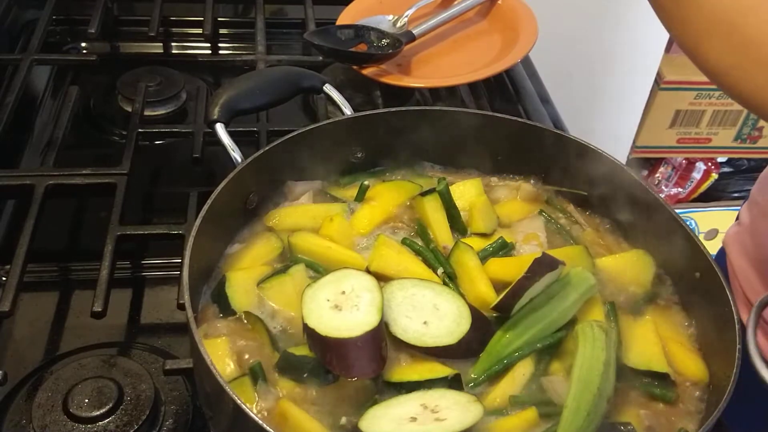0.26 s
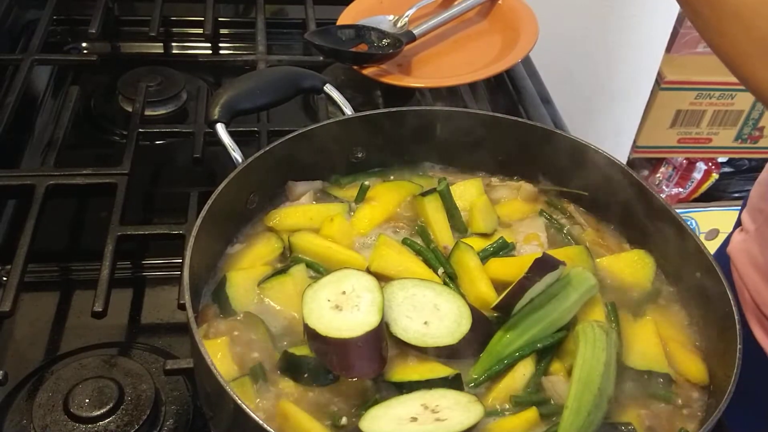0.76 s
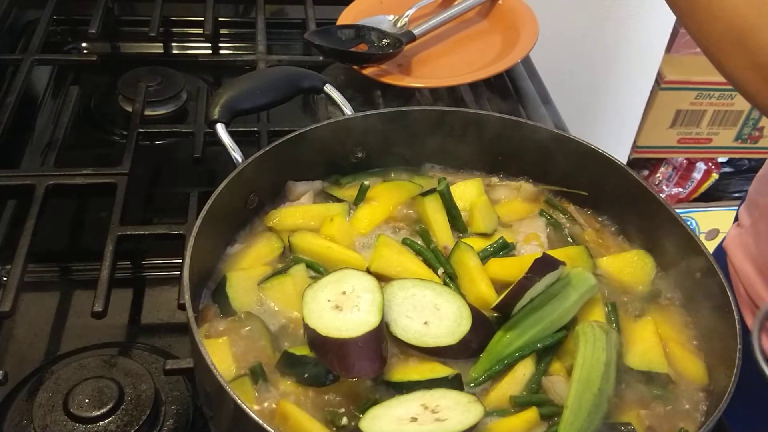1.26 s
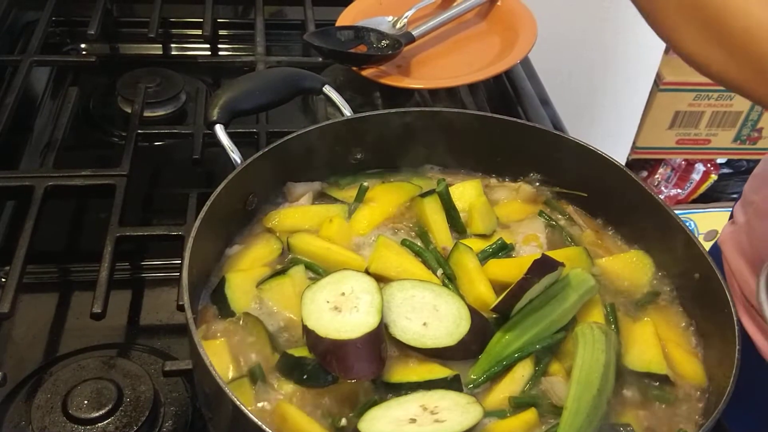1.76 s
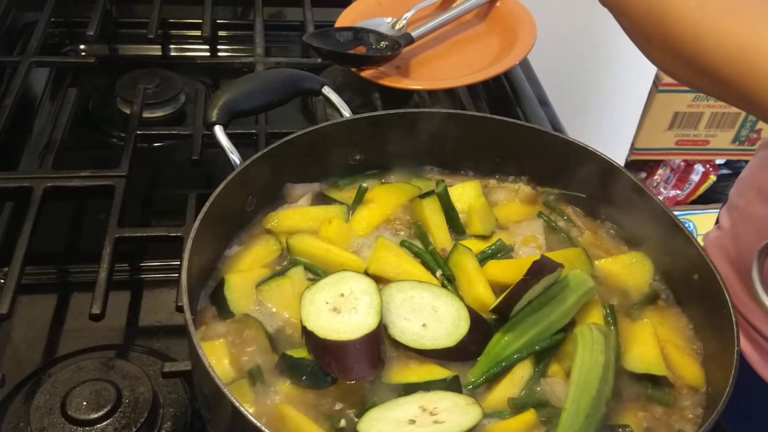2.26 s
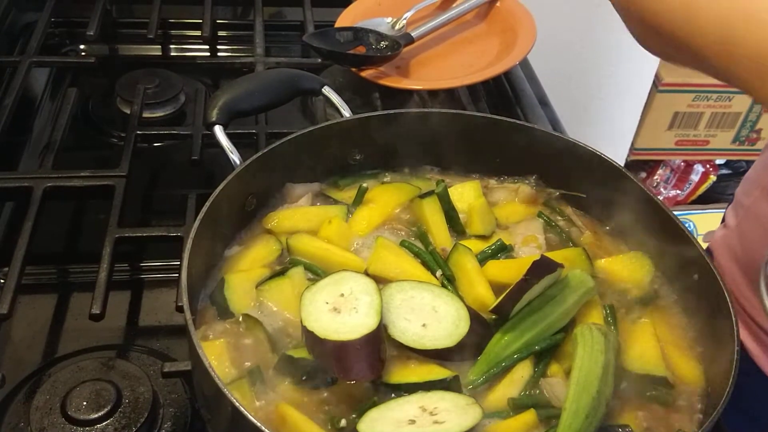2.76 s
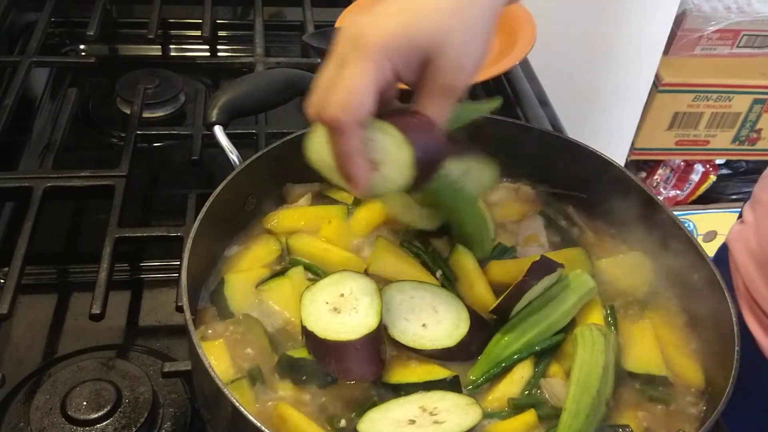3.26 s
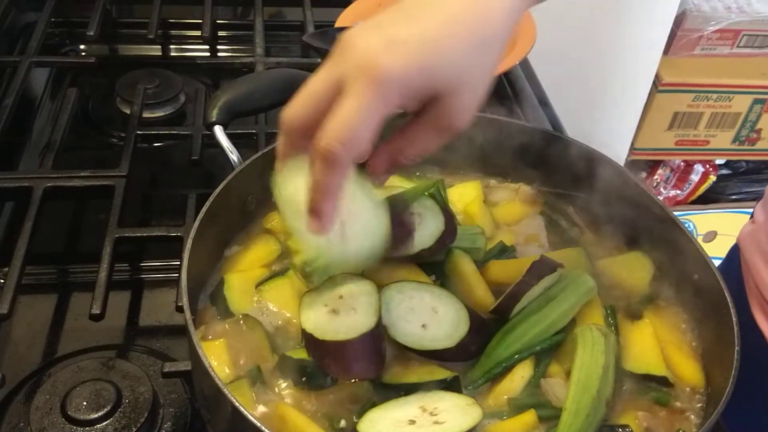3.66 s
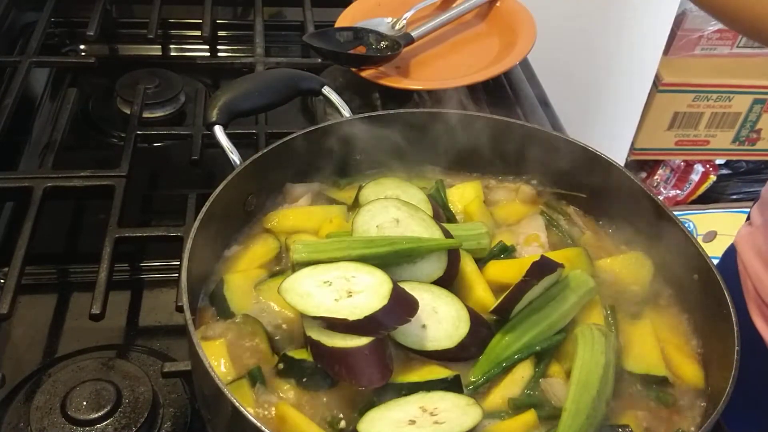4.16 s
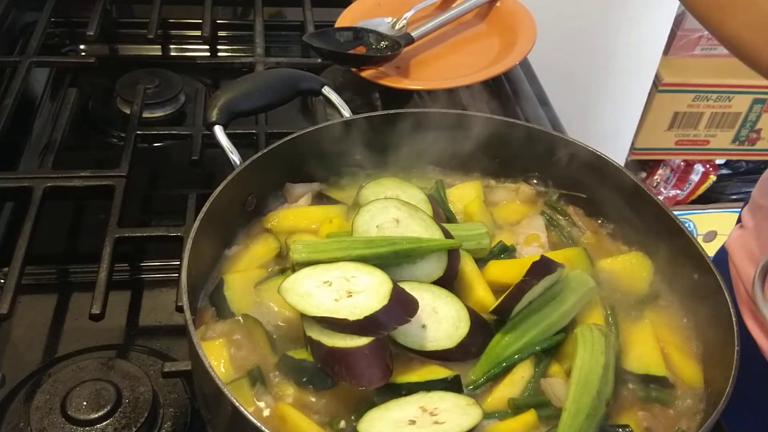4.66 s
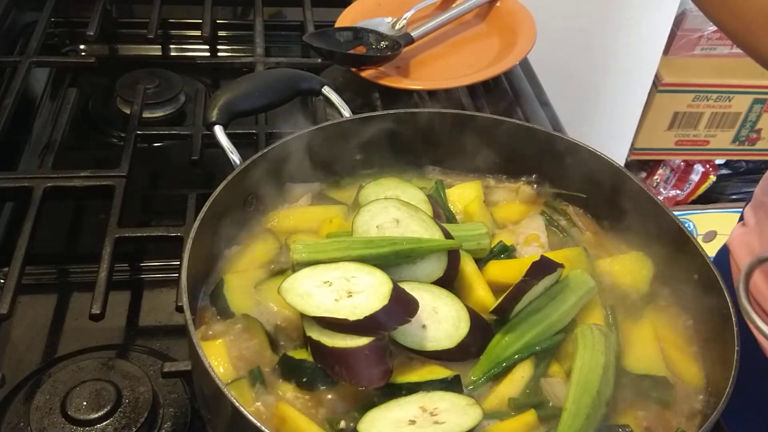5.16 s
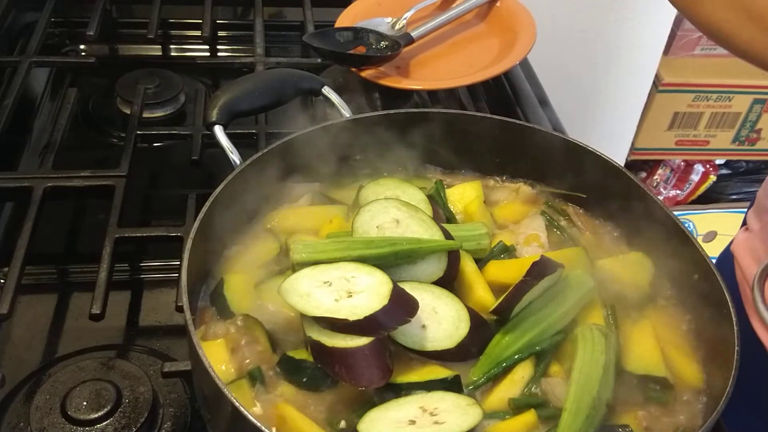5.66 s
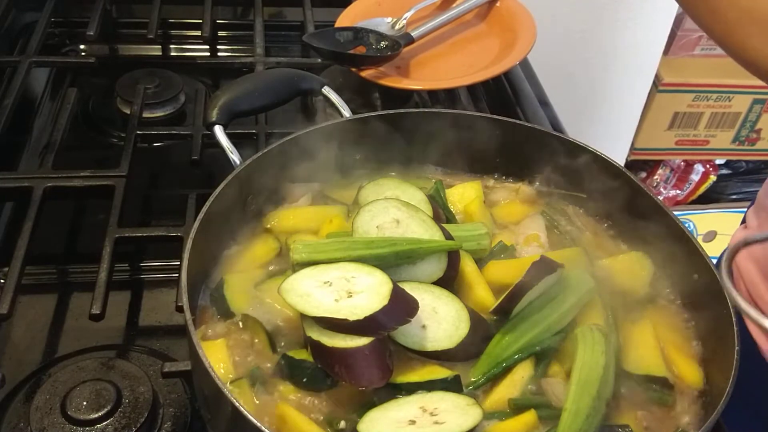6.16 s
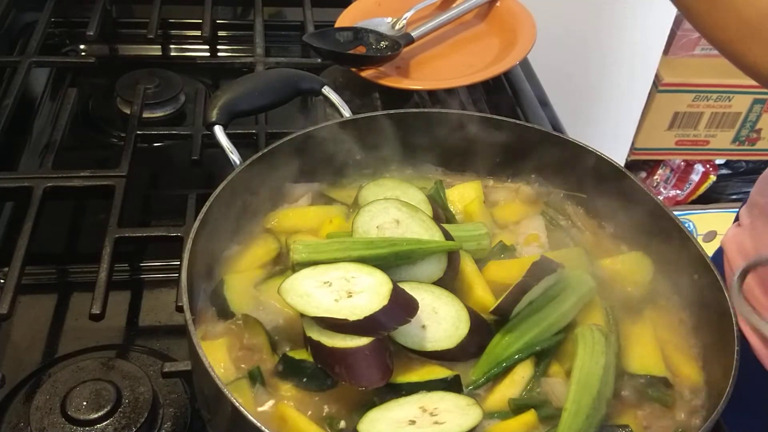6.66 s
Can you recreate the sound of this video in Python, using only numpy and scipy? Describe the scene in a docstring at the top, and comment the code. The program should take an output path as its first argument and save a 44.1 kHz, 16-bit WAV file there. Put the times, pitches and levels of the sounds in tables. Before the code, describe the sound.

Close stereo phone pickup of small wet bubbles popping in a simmering pot over very faint hiss and rumble. Sharp metallic ticks and clinks come irregularly beside it, with low thumps at the opening and at one and a half seconds. A quieter bubbling stretch follows, then scattered clinks, a brief scrape, and a cluster of harder clinks around a ringing bowl hit, with a short room tail.

```python
"""Steel kitchenware beside a simmering pot

Steel clinks (noisy crack plus ringing modes), a struck bowl, scrapes and dull worktop knocks, close to a phone.
A wide pot simmers on a gas stove: bubbles are damped gliding tones, single or crowded into clusters.
Filtered noise makes rumble, hiss and the kitchen's tail; sines make the hum. The phone's noise suppressor
holds these down and lets them up while something louder sounds."""
import sys
import numpy as np
from scipy import signal
from scipy.fft import rfft, irfft, next_fast_len
from scipy.io import wavfile
from scipy.ndimage import uniform_filter1d, minimum_filter1d

SR = 44100
rng = np.random.default_rng(int(sys.argv[2]) if len(sys.argv) > 2 else 0)


def materialize(psi):
    """Save the field psi as 16-bit PCM at rate SR to the path in sys.argv[1].

    A 1-D psi becomes a single channel; in a 2-D psi each row is a channel.
    """
    bounded = np.clip(np.atleast_2d(psi).T, -1, 1)
    quanta = np.round(bounded * 32767).astype(np.int16)
    wavfile.write(sys.argv[1], SR, quanta)


N = 304731

# kitchen rumble, relative spectrum: f/Hz, level/dB
RUMBLE_SPECTRUM = [(24, -60), (40, -4.5), (180, -9.5), (218, -3), (333, -13.5), (462, -6.5), (1170, -12.5),
                   (1280, -2), (1500, -24.5), (1960, -23.5), (2470, -21.5), (2770, -21.5), (4000, -55),
                   (5200, -68), (8800, -120)]
# hum tones: f/Hz, level re rumble/dB
HUM_TONES = [(130, -5.5), (152, -9.5), (212, -7), (835, -7.5)]
# steam and gas hiss, relative spectrum: f/Hz, level/dB
HISS_SPECTRUM = [(2200, -92), (3000, -0.5), (4100, -6.5), (5100, -3), (7250, -5), (9000, 0.5), (10500, 8),
                 (12000, -4), (14000, -4), (16000, -11)]
# hiss level, suppressor open: t/s, level/dB
STEAM_LEVEL = [(0, -56), (1, -59), (2, -62.5), (3, -63), (4, -64), (5, -62.5), (6, -65), (6.9, -61.5)]
# hiss texture: flicker/dB per standard deviation, spit size/dB
SIZZLE_DB = (10., 18.)
# clusters of small bubbles: start t/s, length/s, level/dB, f/Hz, finer bubbles f/Hz, their level re cluster/dB
CLUSTERS = [(0.001, 0.17, -54, 1365, 2440, -33), (0.222, 0.034, -57.5, 1326, 3210, -17),
            (0.313, 0.015, -58, 1367, 3250, -3), (0.389, 0.24, -54.5, 1401, 3174, -10.5),
            (0.703, 0.17, -61.5, 1437, 2900, 0), (0.895, 0.075, -60, 1255, 2680, -13),
            (1.009, 0.11, -55, 1460, 2463, -7.5), (1.3, 0.053, -61, 1435, 2570, -20),
            (1.472, 0.19, -50, 1418, 2590, -10), (1.738, 0.039, -61.5, 1383, 1880, -12),
            (1.86, 0.051, -60, 1374, 2380, -24), (1.907, 0.076, -61.5, 1314, 2420, -21),
            (2.065, 0.17, -53.5, 1482, 2260, -20.5), (2.354, 0.058, -58.5, 1517, 1985, -0.5),
            (2.494, 0.025, -59, 1417, 2384, -5.5), (2.621, 0.033, -57.5, 1500, 2300, -12),
            (2.87, 0.069, -59.5, 1487, 2370, -13.5), (3.128, 0.041, -62.5, 1504, 2460, -18),
            (3.184, 0.16, -55.5, 1515, 2220, -16.5), (3.436, 0.086, -56, 1275, 3030, -18),
            (3.644, 0.049, -57, 1257, 2390, -7), (3.747, 0.061, -51, 1422, 2465, -7.5),
            (3.848, 0.025, -66, 1492, 3040, -8), (3.911, 0.04, -56.5, 1412, 3110, -8.5),
            (3.953, 0.022, -70, 1490, 2600, -25), (4.347, 0.065, -58, 1550, 2370, -20),
            (4.528, 0.064, -56.5, 1350, 2360, -16), (4.707, 0.03, -62, 1519, 2700, -11.5),
            (4.765, 0.022, -60.5, 1300, 2507, 7), (4.802, 0.029, -58.5, 1694, 2170, -22),
            (4.903, 0.31, -55, 1547, 2640, -19), (5.662, 0.089, -63.5, 1400, 3080, -13),
            (5.793, 0.13, -60.5, 1344, 2790, -23), (5.992, 0.028, -56.5, 1510, 3040, -7.5),
            (6.124, 0.11, -51, 1372, 2650, -14), (6.31, 0.2, -53, 1705, 2380, -28),
            (6.626, 0.23, -51.5, 1423, 2200, -17)]
# bubbles that stand out: t/s, peak level/dB, f/Hz
BUBBLES = [(0.246, -51.5, 1300), (0.379, -42, 1297), (0.386, -48, 3010), (0.285, -48, 3230),
           (0.405, -42, 1465), (0.429, -48, 3020), (0.47, -54, 1500), (0.589, -42, 1400),
           (0.718, -45, 1346), (0.778, -48, 1437), (0.902, -51.5, 1223), (1.031, -57, 2530),
           (1.09, -51, 1475), (1.305, -46, 1440), (1.353, -54.5, 1440), (1.453, -46, 1730),
           (1.54, -46, 1800), (1.563, -48, 1840), (1.646, -46, 1417), (1.496, -38.5, 1010),
           (1.516, -50, 1180), (1.727, -50, 1390), (2.05, -60.5, 3050), (2.058, -51, 2344),
           (2.084, -53, 2290), (2.11, -45, 1380), (2.359, -52.5, 1970), (2.47, -56.5, 1425),
           (2.585, -55.5, 1510), (2.619, -49.5, 1510), (2.759, -59.5, 1400), (2.835, -59, 1820),
           (2.858, -50.5, 1786), (2.872, -51, 1270), (2.899, -49, 1236), (2.93, -59, 3115),
           (2.955, -62, 3080), (2.99, -58, 3145), (2.991, -55.5, 1835), (3.093, -74.5, 2430),
           (3.215, -48, 1444), (3.324, -68, 1410), (2.949, -44.5, 1827), (3.117, -51.5, 1416),
           (3.19, -47, 1706), (3.25, -42, 1350), (3.308, -48, 1790), (3.318, -74, 2300), (3.29, -60, 2350),
           (3.457, -47.5, 1306), (3.469, -55.5, 3075), (3.629, -56.5, 1970), (3.707, -51, 2470),
           (3.776, -61, 2420), (3.845, -51, 1656), (3.94, -60, 3110), (3.54, -62, 1280), (3.58, -58, 1304),
           (3.907, -49.5, 1414), (4.093, -58.5, 2436), (4.11, -59, 1530), (4.166, -58.5, 1820),
           (4.188, -50.5, 1307), (4.211, -59.5, 2505), (4.224, -58, 1360), (2.489, -79, 2240),
           (2.591, -61, 2570), (3.665, -71, 2430), (3.819, -57, 3090), (4.331, -47.5, 1392),
           (4.378, -47.5, 1820), (4.521, -50.5, 1510), (4.553, -48, 1252), (4.686, -52, 1480),
           (4.951, -44, 1504), (5.005, -42.5, 1694), (5.025, -54, 1780), (5.047, -47, 1784),
           (5.096, -42, 1927), (5.16, -49, 1426), (5.36, -63, 1126), (5.531, -54, 1435), (5.679, -52, 1355),
           (5.73, -56.5, 3100), (5.729, -59, 2140), (5.75, -56, 1376), (5.807, -48, 1500),
           (5.858, -47.5, 1330), (5.991, -54.5, 1720), (6.078, -49.5, 1700), (6.123, -47.5, 1400),
           (6.138, -42.5, 1278), (6.196, -42, 1470), (6.368, -42, 1704), (6.504, -44, 1730),
           (6.546, -49, 1690), (6.63, -47, 1364), (6.68, -53, 1406), (6.69, -46, 2210), (6.715, -44, 2040),
           (6.73, -45.5, 2020), (6.784, -46, 1483), (6.839, -51, 2390), (6.867, -48.5, 1292)]
# pops of a few cycles where a skin of broth snaps: t/s, level before POP_DB/dB, f/Hz
POPS = [(0.378, -53, 1380), (1.517, -31.5, 1114), (1.8446, -37.5, 1360), (1.932, -33, 1320),
        (2.0733, -30.5, 1550), (2.0886, -37, 1450), (2.104, -31, 1360), (2.138, -36, 1680),
        (2.152, -34, 1720), (2.162, -36, 1480), (2.1993, -36.5, 1600), (2.3382, -37, 1530),
        (2.373, -34, 1510), (3.1352, -44, 1630), (3.2508, -61, 1140), (3.252, -39, 1244),
        (3.265, -34.5, 1386), (3.2807, -31.5, 1530), (3.297, -40, 1540), (3.313, -38, 1480),
        (3.746, -36, 1380), (3.774, -35.5, 1380), (3.798, -38, 1400), (3.9884, -39, 1470),
        (4.6817, -42, 1507), (5.257, -37.5, 1356), (5.5316, -62.5, 1440), (6.686, -31.5, 1380),
        (6.692, -38, 1400), (6.7771, -29, 1720), (6.801, -31, 1330), (6.8434, -50, 1320)]
# deep glugs: t/s, peak level/dB, f/Hz, t60/s
GLUGS = [(0.385, -48.5, 467, 0.024), (1.26, -59, 440, 0.05), (2.338, -59, 450, 0.072),
         (2.925, -49, 462.7, 0.16), (2.95, -48, 485, 0.029), (2.981, -53, 440, 0.039),
         (4.94, -58, 510, 0.045)]
# dull knocks of something set down: t/s, nominal level/dB, loudest ring f/Hz, left minus right/dB
KNOCKS = [(0.001, -26.5, 690, -3), (0.013, -47, 755, -24), (0.028, -30.5, 89, -2), (0.049, -35, 457, -3),
          (1.491, -49, 1300, 7), (1.5, -36, 139, -3), (1.518, -40, 1160, -18), (1.529, -28, 740, -3),
          (1.537, -32.5, 730, -1), (1.5447, -31.5, 123, -1.5), (1.547, -28.5, 730, -2),
          (1.567, -44, 121, 0.0), (1.591, -39, 734, -4), (1.604, -46, 127, -2), (1.512, -40, 460, -6),
          (1.574, -46, 460, 0.1), (1.625, -49, 885, -6), (1.646, -48, 140, -2.5)]
# worktop modes: f/Hz, level/dB, t60/s
WORKTOP_MODES = [(100.6, -7, 0.15), (148, 2, 0.11), (459, 7, 0.046), (730, 6.5, 0.074), (880, -3, 0.065),
                 (1150, 10, 0.0095), (1227, 8, 0.028)]
# scrapes of steel on steel: t/s, crest level/dB, swell/s, fade/s, base f/Hz, left minus right/dB
SCRAPES = [(0.95, -59, 0.05, 0.092, 4800, -1.5), (1.134, -61.5, 0.021, 0.041, 4460, -1),
           (1.224, -56, 0.015, 0.032, 4700, 0.1), (1.359, -59.5, 0.023, 0.055, 5070, -2),
           (5.638, -47, 0.0018, 0.032, 3000, -1), (6.612, -44.5, 0.013, 0.014, 3030, 0),
           (6.692, -64.5, 0.008, 0.012, 2500, 20)]
# blows on a steel bowl: t/s, peak level/dB, left minus right/dB
BOWL_HITS = [(6.362, -16.5, -5), (6.496, -52, -4)]
# bowl modes: f/Hz, level/dB, t60/s
BOWL_MODES = [(2100, -14, 0.057), (2320, -4, 0.099), (2373, -2.5, 0.076), (2622, -13, 0.054),
              (3330, -15, 0.052), (3990, -0.5, 0.022), (5930, 1, 0.026)]
# steel clinks: t/s, nominal level/dB, loudest ring f/Hz,
# relative crack levels of body/dB, edge/dB, air/dB, left minus right/dB
CLINKS = [(0.0014, -32, 2110, 7, 4, -38, 0.5), (0.0874, -26, 10700, -35, -9, -12, -2.5),
          (0.269, -30, 9600, -23, -15, -35, 1), (0.3034, -27, 10000, -31, -7, -16, -1.5),
          (0.3809, -36.5, 7700, -16, -3, -32, 10), (0.3942, -39.5, 3120, -11, -2, -30, -6),
          (0.444, -31, 10300, -28, -12, -23, -4), (0.5682, -41, 3240, -22, -10, -30, -1),
          (0.6813, -27, 3170, -6.5, -2, -42, 1), (0.7999, -26, 3240, -12.5, -9, -37, -0.5),
          (1.2516, -42, 9900, -47, -11, -22, 2), (1.2834, -46, 9800, -50, -7, -16, -24.5),
          (1.4909, -25, 3000, -6, -3.5, -43, -0.5), (1.722, -40, 10200, -46, -28.5, -9, -2),
          (1.8725, -55.5, 10600, -44, -14, 0, -24), (2.021, -46, 10100, -44, -19, -16, -5),
          (2.2453, -36, 10500, -43, -10, -9, -3), (2.478, -41.5, 9000, -34, -32, -33, 3),
          (2.758, -50, 2420, -19, -10, -29, -7), (3.162, -43.5, 5860, -33, -2, -13, -3),
          (3.754, -44.5, 2320, -12, -14, -8, -9.5), (3.9057, -50, 3200, -14, -27, -5, -8),
          (4.2966, -41, 3270, -14, -11, -40, 0), (4.355, -26, 11200, -39, -16, -20, -0.5),
          (4.7343, -27.5, 8400, -16.5, -9, -19, 0.5), (4.9121, -31, 2830, -14, -4, -24, 2),
          (5.035, -36.5, 10000, -36, -4, -21, 1), (5.0811, -27, 2530, -1.5, -2.5, -40, 0.5),
          (6.0195, -45.5, 9500, -24, -21, -23, -8), (6.1211, -33.5, 2550, -8, 0, -39, 3),
          (6.1551, -26, 2440, 1.5, -4, -32, -0.5), (6.2047, -25.5, 2370, -0.5, -5, -38, 0.5),
          (6.266, -36.5, 2680, -11, -7, -23, -3), (6.3618, -20.5, 2830, 6.5, -2.5, -34, 2),
          (6.4961, -33.5, 2230, 2, -1, -35, -1.5), (6.7046, -24.5, 3010, -11, -8.5, -23, 0),
          (6.827, -36.5, 2680, -9, -10.5, -21, 1)]
# clinking steel modes: f/Hz, level/dB, t60/s
STEEL_MODES = [(1955, -6, 0.045), (2330, -6, 0.04), (2385, -2, 0.045), (2540, -2, 0.032), (2670, -2, 0.032),
               (2960, -6, 0.03), (3240, -3, 0.04), (3750, -6, 0.035), (4120, -3, 0.022), (4500, -6, 0.028),
               (5720, 4, 0.016), (7240, 6, 0.016), (9710, 13, 0.011), (11300, 1, 0.011)]
# crack bands body, edge, high, air: centre f/Hz, width/Hz
CRACK_BANDS = [(3000, 2070), (6200, 2900), (9700, 3130), (13400, 2560)]

RUMBLE_DB = -63.5  # 160-1520 Hz rms, suppressor open
HUM_WANDER_RAD = 9.  # rms phase drift in 1 s
SWELL_DB_PER_S, FADE_DB_PER_S = 564, 398  # cluster onset and decay
SIMMER_DB = -79.5  # small bubbles between clusters
LOWEST_HZ = 1226  # small-bubble pitches fold upward here
SPREAD, FINE_SPREAD = 0.1165, 0.036  # pitch scatter as a share
SIZE_SCATTER_DB = 4.5
POP_DB, POP_T60_S, POP_RISE_S = -8, 0.011, 0.004
GRIT_DB = 3.5
STEEL_LAG_S = .00006  # steel is nearer the right port
CRACK_HIGH_DB = -4  # relative level of the high band, every crack
RING_DB, CRACK_DB = -6, -0.5  # re nominal clink level
RING_PER_DB = 0.95  # extra ring per dB of clink level over -25 dB
RATTLE_DB, RATTLE_S = -34.5, 0.18  # ticks trailing a clink
RING_SEND_DB, BOWL_SEND_DB = -11, -15  # level into the kitchen
THIN_HZ, THIN_SEND_DB = 7000, -1.5  # clinks ringing above this are light ticks
TAIL_FLICKER_DB = 6.  # per standard deviation
OPEN_DB, SHUT_DB, LISTEN_S = -46.5, -68.5, 0.01  # fully open, lowest level told apart, averaging
TREBLE_OPEN_DB, TREBLE_SHUT_DB, HOLD_S = -46.5, -69.5, 0.067  # steel alone also opens the treble
RUMBLE_SLOPE, HISS_SLOPE, TAIL_SLOPE = 0.59, 0.71, 0.49  # dB of cut per dB under open level
TOP_HZ = 15900


def undb(db):
    """dB to amplitude."""
    return 10 ** (np.asarray(db, float) / 20)


def unit(x):
    """Scale to rms 1."""
    return x / np.sqrt(np.mean(x ** 2))


def band(x, f_hz, width_hz):
    """Band-pass, six poles."""
    edges_hz = [max(f_hz - width_hz / 2, 20), min(f_hz + width_hz / 2, .45 * SR)]
    return signal.sosfilt(signal.butter(3, edges_hz, "band", fs=SR, output="sos"), x)


def curve(table):
    """Columns of a table, interpolated to one value a sample."""
    t_s, *columns = np.transpose(table)
    return [np.interp(np.arange(N) / SR, t_s, c) for c in columns]


def ring(f_hz, t60_s, rise_s, glide=0., phase=0., order=1):
    """Decaying sine with a soft start, envelope peak 1; glide is the pitch change by t60 as a share."""
    t = np.arange(int(.8 * t60_s * SR) + 8) / SR
    shape = (1 - np.exp(-t / rise_s)) ** order * np.exp(-np.log(1000) * t / t60_s)
    cycles = f_hz * (t + glide * t ** 2 / (2 * t60_s))
    return shape / shape.max() * np.sin(2 * np.pi * cycles + phase)


def add(out, t_s, x, pan_db, lag_s=0.):
    """Mix x in at t_s; the left port hears it lag_s later."""
    for channel, side in enumerate((.5, -.5)):
        i = max(int((t_s + side * lag_s) * SR), 0)
        part = x[:N - i]
        out[channel, i:i + len(part)] += part * undb(side * pan_db)


def struck(modes, near_hz, focus_db, rise_s, far_db, detune, scatter_db):
    """Struck solid: modes lose focus_db per octave from near_hz, up to far_db; every blow varies."""
    out = np.zeros(int(.2 * SR))
    for (f_hz, level_db, t60_s), (u, v) in zip(modes, rng.standard_normal((len(modes), 2))):
        x = ring(f_hz * (1 + detune * u), min(t60_s, .2), rise_s, phase=v)
        loss_db = min(focus_db * abs(np.log2(f_hz / near_hz)), far_db)
        out[:len(x)] += x * undb(level_db + scatter_db * v - loss_db)
    return out / np.abs(out).max()


def coloured(spectrum, alike_hz, noise):
    """Two noises given a spectrum and mixed to stereo, alike in both channels below alike_hz."""
    size = next_fast_len(N)
    f_hz = np.maximum(np.arange(size // 2 + 1) * SR / size, 1)
    point_hz, point_db = np.transpose(spectrum)
    gain = undb(np.interp(np.log(f_hz), np.log(point_hz), point_db))
    mid, side = rfft(noise, size) * gain
    side = side * f_hz / np.hypot(f_hz, alike_hz)
    return irfft(np.array([mid + side, mid - side]), size)[:, :N]


def flicker(x, flicker_db):
    """Narrow bands waver alone over a few hundredths of a second; lifts are capped, dips are not."""
    z = signal.stft(x, nperseg=1024)[2]
    walk = uniform_filter1d(rng.standard_normal(z.shape[1:]), size=4, axis=0)
    walk = uniform_filter1d(walk, size=3, axis=1)
    return signal.istft(z * undb(flicker_db * np.minimum(unit(walk), 1)))[1][:, :N]


def sizzle(flicker_db, spit_db):
    """Hiss of steam and gas: flickering noise with tiny random spits."""
    spits = undb(spit_db) * (rng.random((2, N)) < .0012) * rng.standard_normal((2, N))
    noise = rng.standard_normal((2, N)) + spits
    hiss = flicker(coloured(HISS_SPECTRUM, 350.0, noise), flicker_db)
    return hiss / np.sqrt(np.mean(band(hiss, 13580, 6870) ** 2))


def hum_tone(f_hz):
    """Sine whose phase drifts as a random walk."""
    drift_rad = HUM_WANDER_RAD * np.cumsum(rng.standard_normal(N)) / np.sqrt(SR)
    return np.sin(2 * np.pi * f_hz * np.arange(N) / SR + drift_rad)


def background(rumble_db, hiss_db):
    """Kitchen rumble and hum, leaning right, plus hiss."""
    rumble = coloured(RUMBLE_SPECTRUM, 1100.0, rng.standard_normal((2, N)))
    rumble /= np.sqrt(np.mean(band(rumble, 840, 1360) ** 2))
    hum = sum(undb(level_db) * hum_tone(f_hz) for f_hz, level_db in HUM_TONES)
    lean = undb([[-1.1], [1.1]])
    return undb(rumble_db) * lean * (rumble + hum) + undb(hiss_db) * sizzle(*SIZZLE_DB)


def db_under_open(x, open_db, shut_db, hold_s):
    """Suppressor detector: dB by which the smoothed, held power lies under the opening level."""
    k, hold = max(int(LISTEN_S * SR / 2), 1), max(int(hold_s * SR), 1)
    power = uniform_filter1d(np.mean(x ** 2, axis=0), k)
    held = -minimum_filter1d(-power, hold, origin=(hold - 1) // 2)
    power = uniform_filter1d(held, k)
    return np.minimum(10 * np.log10(np.maximum(power, 0) + undb(shut_db) ** 2) - open_db, 0)


def kitchen(x, t60_s, wet_db, tilt_hz):
    """Diffuse room tail: wide decaying noise, duller as it fades."""
    t = np.arange(int(t60_s * SR)) / SR
    mid, side = rng.standard_normal((2, len(t))) * (1 - np.exp(-t / 0.00058))
    side = signal.lfilter(*signal.butter(2, 350, "high", fs=SR), side)  # bass alike in both channels
    noise = mid + side * np.array([[1], [-1]])
    dull = signal.lfilter(*signal.butter(1, tilt_hz, fs=SR), noise)
    bright = undb(-4.0) * (noise - dull)
    tail = dull * np.exp(-np.log(1000) * t / t60_s) + bright * np.exp(-np.log(1000) * t / (0.84 * t60_s))
    tail /= np.sqrt((tail ** 2).sum(1, keepdims=True))
    return undb(wet_db) * signal.oaconvolve(x, tail, axes=1)[:, :N]


def boil(fine):
    """Level/dB of small (fine=0) or finer (fine=1) bubbles: clusters swell, hold and fade."""
    t = np.arange(0, N / SR, .001)
    levels_db = []
    for start_s, length_s, level_db, _, _, fine_db in CLUSTERS:
        swell_db = SWELL_DB_PER_S * np.maximum(start_s - t, 0)
        fade_db = FADE_DB_PER_S * np.maximum(t - start_s - length_s, 0)
        levels_db.append(level_db + fine * fine_db - swell_db - fade_db)
    level_db = np.maximum(np.max(levels_db, axis=0), SIMMER_DB - 11.0 * fine)
    return np.interp(np.arange(N) / SR, t, level_db)


def crowd(times_s, pitches_hz, spread, glide):
    """Small bubbles: damped tones scattered in pitch, size, length, glide and place."""
    out = np.zeros((2, N))
    for t_s, f_hz, (a, b, c, d, e) in zip(times_s, pitches_hz, rng.standard_normal((len(times_s), 5))):
        f_hz = LOWEST_HZ + abs(f_hz * (1 + spread * a) - LOWEST_HZ)
        t60_s = 0.029 * np.exp(0.45 * d)
        tone = ring(f_hz, t60_s, 0.19 * t60_s, glide * (0.28 + e), 6 * c, order=2)
        add(out, t_s, undb(SIZE_SCATTER_DB * b) * tone, -1.5 + 3 * c, 0.00027 * c)
    return unit(out)


def small_bubbles():
    """Random crowds of small and finer bubbles, pitched by cluster and shaped by the boil level."""
    start_s, length_s, _, pitch_hz, fine_pitch_hz, _ = np.transpose(CLUSTERS)
    middle_s = start_s + length_s / 2
    small_s, fine_s = rng.random(size=3700) * N / SR, rng.random(size=700) * N / SR
    small_hz = np.interp(small_s, middle_s, pitch_hz)
    fine_hz = fine_pitch_hz[np.abs(fine_s[:, None] - middle_s).argmin(axis=1)]  # nearest cluster
    small = undb(boil(fine=0)) * crowd(small_s, small_hz, SPREAD, 0.065)
    return small + undb(boil(fine=1.0)) * crowd(fine_s, fine_hz, FINE_SPREAD, 0.039)


def large_bubbles():
    """Bursting bubbles glide up, each with a fainter follower; pops are short, glugs deep."""
    out = np.zeros((2, N))
    for (t_s, level_db, f_hz), (a, b, c) in zip(BUBBLES, rng.standard_normal((len(BUBBLES), 3))):
        t60_s, gap_s = 0.044 * np.exp(0.023 * a), 0.016 + 0.0023 * b
        for k in range(2):
            tone = ring(f_hz * (1 + 0.024 * k * b), t60_s, 0.0037, 0.0082, order=2)
            add(out, t_s + k * gap_s, undb(level_db - 7.8 * k) * tone, -2.5 + 3.5 * c, 0.000084 * a)
    for t_s, level_db, f_hz in POPS:
        add(out, t_s, undb(level_db + POP_DB) * ring(f_hz, POP_T60_S, POP_RISE_S, 0.014, order=3), -2.)
    for t_s, level_db, f_hz, t60_s in GLUGS:
        add(out, t_s, undb(level_db) * ring(f_hz, t60_s, 0.04 * t60_s, 0.21), -3.)
    return out


def knocks():
    """Soft blows into low worktop modes, each with a dull noise rattle."""
    out, t = np.zeros((2, N)), np.arange(int(.1 * SR)) / SR
    for t_s, level_db, f_hz, pan_db in KNOCKS:
        rattle = band(rng.standard_normal(len(t)), 967, 1770) * (1 - np.exp(-t / 0.0073)) * np.exp(-t / 0.03)
        blow = struck(WORKTOP_MODES, f_hz, focus_db=18.0, rise_s=0.002, far_db=18.7, detune=0.0088,
                      scatter_db=2.7)
        add(out, t_s, undb(level_db - 4.5) * blow, pan_db)
        add(out, t_s, undb(level_db - 15.5) * rattle / np.abs(rattle).max(), pan_db)
    return out


def scrapes():
    """Steel on steel: gritty treble noise that swells and fades."""
    out, t = np.zeros((2, N)), np.arange(int(.25 * SR)) / SR
    for t_s, level_db, swell_s, fade_s, base_hz, pan_db in SCRAPES:
        grit = undb(GRIT_DB * unit(uniform_filter1d(rng.standard_normal(len(t)), size=60)))
        shape = (1 - np.exp(-t / swell_s)) ** 2 * np.exp(-t / fade_s)
        noise = unit(band(rng.standard_normal(len(t)) * grit, base_hz + 4500, 7300))
        add(out, t_s, undb(level_db) * noise * shape / shape.max(), pan_db, STEEL_LAG_S)
    return out


def bowl_hits(out, send):
    """Steel bowl struck by the utensil: all modes ring; adds to the direct sound and the room send."""
    for t_s, level_db, pan_db in BOWL_HITS:
        blow = undb(level_db) * struck(BOWL_MODES, 2385, focus_db=0., rise_s=0.0043, far_db=0.,
                                       detune=0.00042, scatter_db=1.4)
        add(out, t_s, blow, pan_db, STEEL_LAG_S)
        add(send, t_s, blow * undb(BOWL_SEND_DB), pan_db, STEEL_LAG_S)


def crack_noise(colour_db):
    """Contact noise: a short puff and trailing ticks, coloured in four bands, peak 1."""
    t = np.arange(int(.1 * SR)) / SR
    ticks = uniform_filter1d(1. * (rng.random(len(t)) < 0.004), size=40) * 40
    shape = np.exp(-t / 0.0035) + undb(RATTLE_DB) * ticks * np.exp(-t / RATTLE_S)
    puff = rng.standard_normal(len(t)) * (1 - np.exp(-t / 0.0022)) * shape
    crack = sum(undb(db) * unit(band(puff, *b)) for db, b in zip(colour_db, CRACK_BANDS))
    return crack / np.abs(crack).max()


def clinks(out, send):
    """Noisy crack plus ringing steel modes; adds to the direct sound and the room send."""
    for t_s, level_db, f_hz, body_db, edge_db, air_db, pan_db in CLINKS:
        crack = undb(level_db + CRACK_DB) * crack_noise((body_db, edge_db, CRACK_HIGH_DB, air_db))
        ring_db = level_db + RING_DB + RING_PER_DB * (level_db + 25.0)  # harder clinks ring more
        steel = undb(ring_db) * struck(STEEL_MODES, f_hz, focus_db=69.0, rise_s=0.0069, far_db=20.8,
                                       detune=0.011, scatter_db=3.2)
        for x, send_db in ((steel, RING_SEND_DB), (crack, THIN_SEND_DB * (f_hz > THIN_HZ))):
            add(out, t_s, x, pan_db, STEEL_LAG_S)
            add(send, t_s, x * undb(send_db), pan_db, STEEL_LAG_S)


def scene():
    """Near sources over suppressed room tails and background."""
    steel, send = np.zeros((2, N)), np.zeros((2, N))
    clinks(steel, send)
    bowl_hits(steel, send)
    wood, broth, rub = knocks(), large_bubbles() + small_bubbles(), scrapes()
    tails = flicker(kitchen(send + undb(-3) * rub, 0.48, 0.5, 6300), TAIL_FLICKER_DB)
    tails = tails + kitchen(wood, 0.29, -8.0, 3000) + kitchen(broth, 0.12, -6.5, 3000)
    steel = steel + rub
    near = steel + wood + broth
    under_db = db_under_open(near + undb(5.5) * tails, OPEN_DB, SHUT_DB, 0.0013)
    treble_under_db = np.maximum(db_under_open(near, OPEN_DB, TREBLE_SHUT_DB, 0.0032),
                                 db_under_open(steel, TREBLE_OPEN_DB, TREBLE_SHUT_DB, HOLD_S))
    hiss_db = curve(STEAM_LEVEL)[0] + HISS_SLOPE * treble_under_db
    floor = background(RUMBLE_DB + RUMBLE_SLOPE * under_db, hiss_db)
    return near + undb(TAIL_SLOPE * under_db) * tails + floor


def record(dry):
    """The phone cuts the top: steep elliptic low-pass."""
    return signal.sosfilt(signal.ellip(10, .2, 70, TOP_HZ, fs=SR, output="sos"), dry)


dry = scene()
out = record(dry)
materialize(out)
```